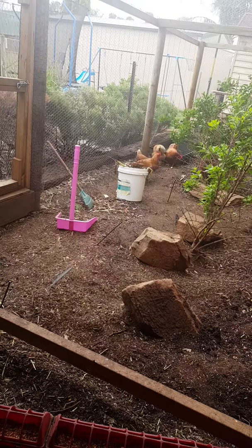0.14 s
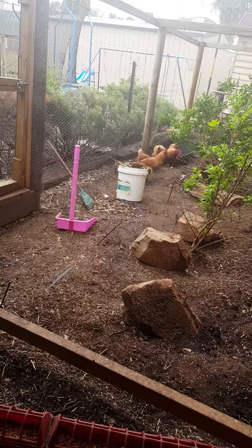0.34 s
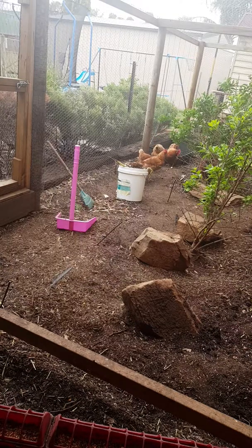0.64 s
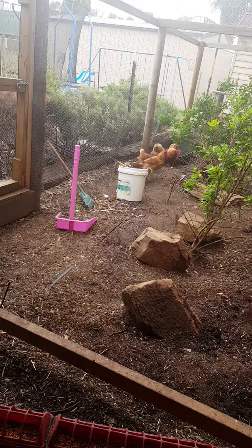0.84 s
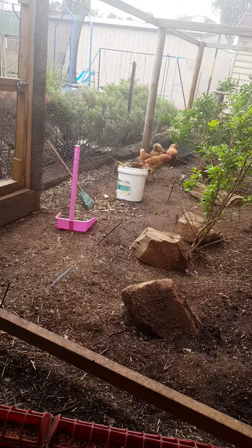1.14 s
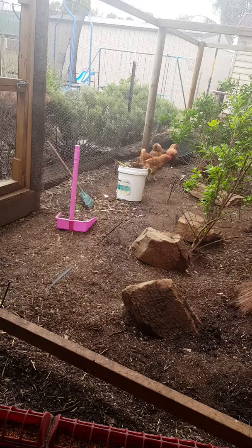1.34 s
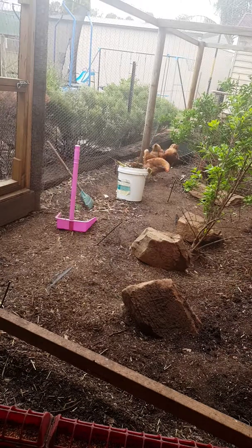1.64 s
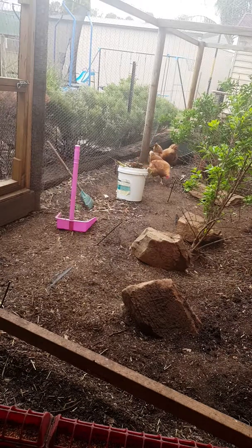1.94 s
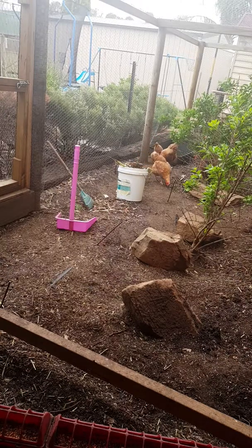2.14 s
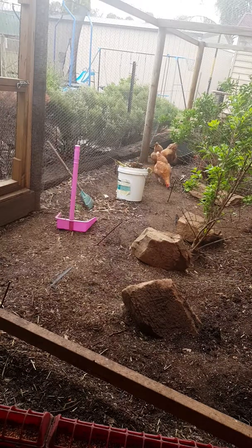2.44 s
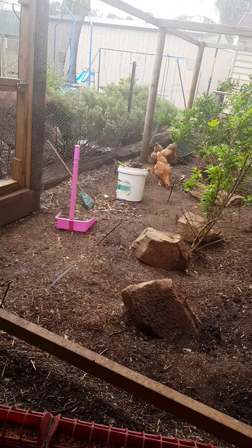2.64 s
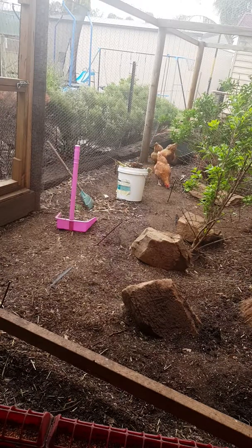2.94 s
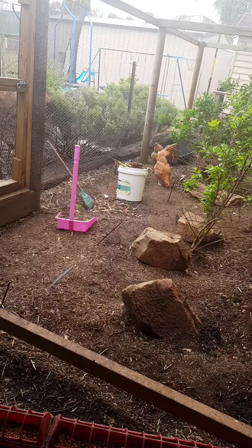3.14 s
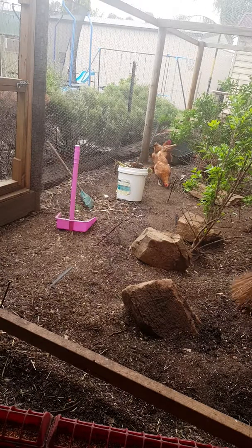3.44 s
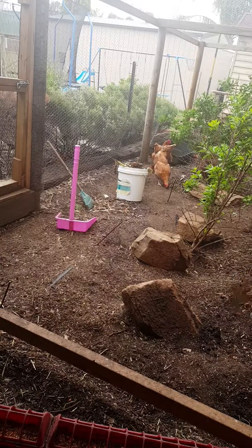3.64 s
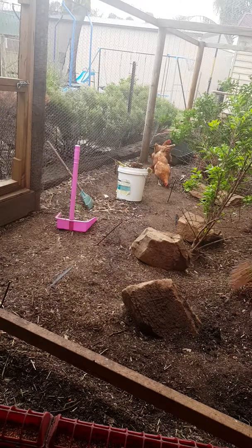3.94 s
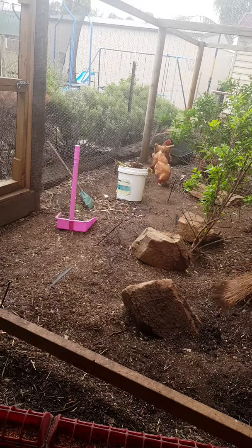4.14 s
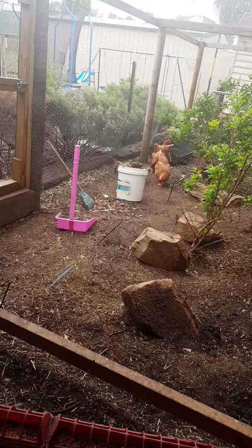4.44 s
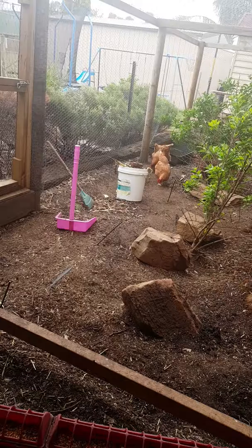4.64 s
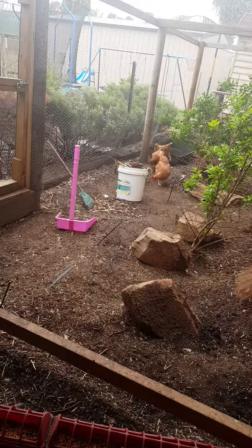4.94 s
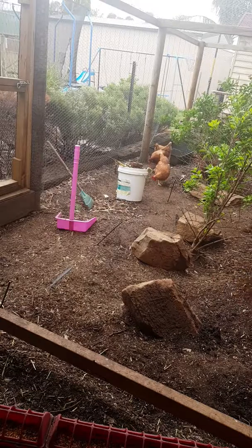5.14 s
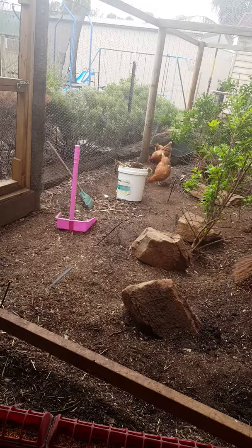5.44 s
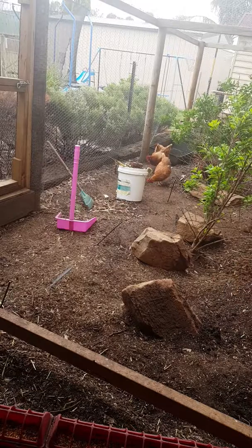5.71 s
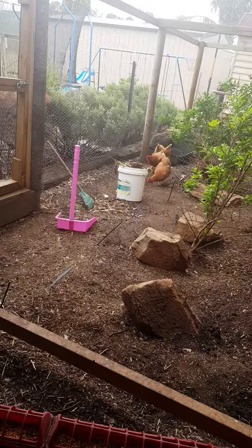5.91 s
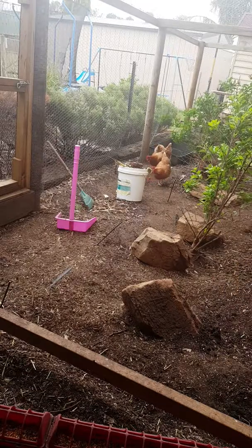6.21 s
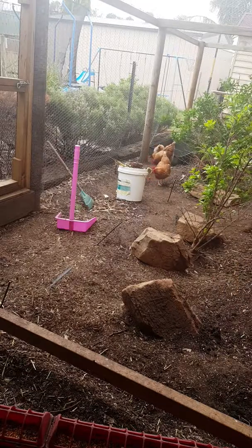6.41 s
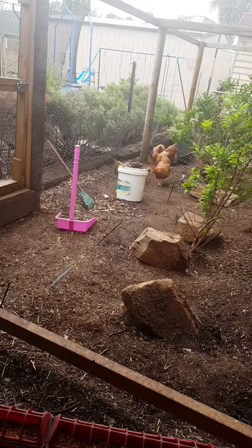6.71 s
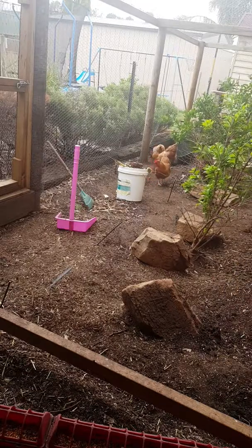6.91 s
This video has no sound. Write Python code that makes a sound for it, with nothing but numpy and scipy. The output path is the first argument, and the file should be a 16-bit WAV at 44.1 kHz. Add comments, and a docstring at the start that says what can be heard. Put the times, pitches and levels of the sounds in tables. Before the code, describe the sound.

Close, hissing broom scrapes over gritty soil, about two a second, while hard bangs echo further off above a low distant rumble.

```python
"""A distant rumble, the last settling dirt of a broom stroke and a soft footfall come first.
In a chicken run, close to the microphone, a straw broom sweeps dry dirt and mulch stroke after stroke:
shaped noise and tiny contacts scrape and hiss, caught straws snap, feet thud as short low cycles.
Three hard bangs and some weaker ones echo from further off as noise clusters with a hollow note.
Late on, a small far bird chirps once, a gliding tone blurred by echo."""
import sys
import numpy as np
from scipy import signal
from scipy.fft import rfft, irfft, next_fast_len
from scipy.io import wavfile
from scipy.ndimage import uniform_filter1d, map_coordinates

SR = 44100
rng = np.random.default_rng(int(sys.argv[2]) if len(sys.argv) > 2 else 0)


def wrap_up_sound(samples):
    """Save the sound to the file named by the first command line argument, as 16-bit audio."""
    columns = np.atleast_2d(samples).T
    # keep every value between -1 and 1, then stretch to whole-number steps
    tamed = np.clip(columns, -1, 1)
    steps = np.round(tamed * 32767).astype(np.int16)
    wavfile.write(sys.argv[1], SR, steps)


N = 311602  # length [samples]


def amp(db):
    """Decibels to gain."""
    return 10 ** (np.asarray(db) / 20)


def unit(x):
    """Scale to rms 1."""
    return x / np.sqrt(np.mean(x ** 2) + 1e-20)


def along(points, hz):
    """Read (frequency [Hz], value) points on a log-frequency axis."""
    f, v = np.transpose(points)
    return np.interp(np.log(hz + 1), np.log(f), v)


def wobble(rate, size=N):
    """A smooth random curve with rate knots a second."""
    knots = rng.standard_normal(int(size * rate / SR) + 4)
    return map_coordinates(knots, [np.arange(size) * rate / SR])


def filtered(x, response):
    """Multiply the spectrum of x by a response of frequency."""
    n = x.shape[-1]
    m = next_fast_len(n + 8192)  # padding keeps the end from wrapping onto the start
    return irfft(rfft(x, m) * response(np.fft.rfftfreq(m, 1 / SR)), m)[..., :n]


def coloured(x, spectrum):
    """Shape x with the given spectrum, at rms 1."""
    return unit(filtered(x, lambda hz: amp(along(spectrum, hz))))


def stereo_noise(alike, size):
    """White noise at two ports, as alike as given at each frequency, by mixing mid and side."""
    def mid_side(hz):
        turn = np.arccos(np.clip(along(alike, hz), -1, 1)) / 2
        return np.array([np.cos(turn), np.sin(turn)])

    mid, side = filtered(rng.standard_normal((2, size)), mid_side)
    return np.array([mid + side, mid - side])


def add(track, s, sound):
    """Mix a sound into the track at time s."""
    part = track[:, max(round(s * SR), 0):][:, :sound.shape[-1]]
    part += sound[..., :part.shape[1]]


# likeness of the background at the two ports: (frequency [Hz], likeness [0-1])
AMBIENT_ALIKE = [(60, 1), (180, 0.93), (350, 0.83), (700, 0.66), (1400, 0.02), (5000, 0)]
# spectra of the distant drone and the far traffic wash: (frequency [Hz], relative level [dB per Hz])
DRONE_SPECTRUM = [(20, -23), (40, -10), (60, -4.5), (76, 4), (100, -4), (150, -6.5), (250, -17.5),
                  (500, -42)]
WASH_SPECTRUM = [(60, -11), (200, -3.5), (320, -1.5), (500, -2), (800, 1), (1200, 0.5), (1800, -7.5),
                 (3000, -15.5), (7000, -16.5), (15000, -24.5)]
# level of the drone, before drone_db is added: (time [s], level [dB])
DRONE_LEVEL = [(0.0, -59), (1.93, -59.5), (3.4, -61.5), (3.85, -58), (6.92, -57), (7.06, -55.5)]
# level of the wash: (time [s], level [dB])
WASH_LEVEL = [(0, -54), (0.73, -52.5), (1.3, -54.5), (1.8, -52), (3.2, -51), (4.3, -51.5), (7.06, -52.5)]


def ambience(drone_db=4, patchy_db=1.85):
    """A distant low drone and the wash of far traffic, drifting slowly and unevenly from band to band."""
    def drift(curve):
        return amp(np.interp(np.arange(N) / SR, *np.transpose(curve)))

    drone = coloured(stereo_noise(AMBIENT_ALIKE, size=N), DRONE_SPECTRUM)
    z = signal.stft(stereo_noise(AMBIENT_ALIKE, size=N), nperseg=2048)[2]
    # random levels, smoothed over neighbouring bands and then over time
    patches = uniform_filter1d(rng.standard_normal(z.shape[1:]), size=3, axis=0)
    patches = uniform_filter1d(patches, size=8, axis=1)
    patchy = signal.istft(z * amp(patchy_db * unit(patches)), nperseg=2048)[1][:, :N]
    wash = coloured(patchy, WASH_SPECTRUM)
    return amp(drone_db) * drone * drift(DRONE_LEVEL) + wash * drift(WASH_LEVEL)


LAND_S, ARC = 0.045, 1.38  # time for all straws to land; roundness of the pressure arc (1 = straight slopes)
LIFT_DROP_DB, LIFT_S = 1.47, 0.03  # extra drop of the scrape as the broom lifts, and its time constant
TIPS_DB, FLICK_FADE_S = -0.33, 0.037  # hiss against scrape at touch-down; fade of the flick after the lift


def stroke(age, press_s, lift_s, db, swell_db, ease_db, flick_db, settle_db_per_s):
    """Gains of one stroke: land, press, ease off, lift, settle; hiss grows until the tips flick free."""
    before = np.clip(1 - age / press_s, 0, 1)
    after = np.clip((age - press_s) / max(lift_s - press_s, 1 / SR), 0, 1)
    lifted = np.maximum(age - lift_s, 0)
    pressure_db = db - swell_db * before ** ARC - ease_db * after ** ARC
    release_db = LIFT_DROP_DB * (1 - np.exp(-lifted / LIFT_S)) + settle_db_per_s * lifted
    scrape = np.minimum(age / LAND_S, 1) * amp(pressure_db - release_db)
    flick = np.minimum(age / lift_s, 1) * np.exp(-lifted / FLICK_FADE_S)
    return np.array([scrape, scrape * amp(TIPS_DB + flick_db * flick)])


DAB_RISE_S, DAB_FADE_S, DAB_TIPS_DB = 0.0056, 0.054, 1  # a dab's attack, its fade, its hiss against its scrape


def dab(age, db):
    """Scrape and hiss gains of a brief touch of the straws."""
    scrape = amp(db) * np.minimum(age / DAB_RISE_S, 1) * np.exp(-age / DAB_FADE_S)
    return np.array([scrape, scrape * amp(DAB_TIPS_DB)])


# broom strokes, close by; levels are before the trims in broom():
# (touch-down time [s], from touch-down to hardest press [s], from touch-down to lift [s],
#  level at hardest press [dB], swell up to it [dB], easing off to the lift [dB],
#  extra hiss as tips flick [dB], settling of dirt [dB per s])
STROKES = [(-0.401, 0.1, 0.22, -40, 5.0, 3.5, 4.0, 48.0), (0.061, 0.197, 0.32, -37, 15, 7.5, 3.5, 56.0),
           (0.742, 0.094, 0.31, -35.5, 3.5, 8, 6.0, 65), (1.278, 0.14, 0.33, -32.5, 12.5, 11, 11.5, 36),
           (1.836, 0.17, 0.27, -42, 4.5, 4.5, 2.5, 37), (2.326, 0.15, 0.18, -43.0, 10, 1.5, 3, 41),
           (2.932, 0.2, 0.309, -37.5, 2.5, 5, 9, 38), (3.467, 0.19, 0.32, -35.5, 12.5, 11.5, 8.5, 85.0),
           (4.043, 0.22, 0.3, -37.5, 4, 12, 9.5, 57), (4.521, 0.16, 0.24, -38.5, 6, 11, 5.5, 60),
           (4.959, 0.074, 0.3, -37.5, 5.5, 6.5, 7, 49), (5.479, 0.1, 0.3, -34.5, 9, 10, 7.5, 86),
           (6.082, 0.081, 0.22, -43.0, 8, 4, 4.5, 50), (6.651, 0.083, 0.22, -39.0, 7, 4.5, 2.5, 40)]
# light dabs of the broom between strokes, before the same trims: (time [s], level [dB])
DABS = [(1.206, -40), (2.224, -46.5), (4.768, -45.5), (4.888, -53), (5.333, -42), (6.04, -44.5),
        (6.577, -49.0), (6.64, -44.5)]


def stroke_gains():
    """Scrape and hiss gains of all the sweeping; overlapping strokes and dabs add in power."""
    power, age = np.zeros((2, N)), np.arange(SR) / SR
    for shape, rows in ((stroke, STROKES), (dab, DABS)):
        for s, *row in rows:
            heard = age[age >= -s]  # a stroke may begin before time 0
            add(power, s, shape(heard, *row) ** 2)
    return np.sqrt(power)


def grit(rate, spread_db, shared, smooth):
    """Tiny contacts of very unequal size on a bed of noise; some reach both ports alike."""
    size = amp(spread_db * np.minimum(rng.exponential(size=(3, N)), 4))
    happens = rng.random((3, N)) < rate / SR
    contacts = unit(happens * size * rng.choice([-1, 1], (3, N)))
    return unit(contacts[:2] + shared * contacts[2] + smooth * rng.standard_normal((2, N)))


def straw_rings(rate, centre_hz, spread_db, t60):
    """Single straws, each ringing briefly at its own pitch, with its own phase at each port."""
    chance = rng.random((int(rate * N / SR), 4))  # columns: when, pitch, size, phase
    t = np.arange(700) / SR
    hz = centre_hz * 2 ** (2 * chance[:, 1:2] - 1)  # within an octave either way
    rarity = -np.log(np.maximum(chance[:, 2:3], np.exp(-4)))
    size = amp(spread_db * rarity - 60 * t / t60)
    at = (chance[:, :1] * N).astype(int) + np.arange(len(t))
    ports = []
    for side in (-.5, .5):
        rings = size * np.sin(2 * np.pi * (hz * t + side * chance[:, 3:]))
        ports.append(np.bincount(at.ravel(), rings.ravel(), N)[:N])
    return unit(np.array(ports))


# spectra of straws scraping soil and of flicking tips: (frequency [Hz], relative level [dB per Hz])
SCRAPE_SPECTRUM = [(300, -36), (900, -15.5), (1500, -6), (2200, -3.5), (3000, -1.5), (4000, 0),
                   (5500, -0.5), (7500, -2), (10000, -4), (15500, -8.5)]
HISS_SPECTRUM = [(2000, -41), (5000, -9.5), (8000, -8.5), (10200, -5.5), (11500, 1), (12600, 2), (14000, 2),
                 (15500, 0.5)]


def broom(scrape_db=0.2, hiss_db=1.0, straw_db=-8, crumb_db=-52, crumb_follow=0.59):
    """Pressed straws scrape the soil while their tips flick grit; the bundle judders as it drags."""
    scrape_gain, hiss_gain = stroke_gains()
    judder_db = 0.85 * wobble(45) + 0.37 * wobble(220)
    scrape = coloured(grit(rate=6000, spread_db=2.5, shared=0.45, smooth=0.87), SCRAPE_SPECTRUM)
    hiss = coloured(grit(rate=4500, spread_db=2.0, shared=0.28, smooth=0.64), HISS_SPECTRUM)
    straws = straw_rings(rate=900, centre_hz=7010, spread_db=1.5, t60=0.023)
    # loose crumbs keep dropping as the stroke lets up, so they stand out in its tail
    crumbs = coloured(grit(rate=250, spread_db=2.0, shared=0.94, smooth=0), SCRAPE_SPECTRUM)
    crumbs = crumbs * (scrape_gain / scrape_gain.max()) ** crumb_follow
    pressed = scrape_gain * (amp(scrape_db) * scrape + amp(straw_db) * straws)
    flicked = hiss_gain * amp(hiss_db + 0.5 * wobble(90)) * hiss
    return (pressed + flicked) * amp(judder_db) + amp(crumb_db) * crumbs


# soft footfalls near the microphone: (time [s], level [dB], pitch [Hz], swell to the fullest push [s])
STEPS = [(.005, -46.5, 126.7, 0.022), (0.724, -40.5, 71, 0.0086), (0.774, -41, 86, 0.011),
         (1.621, -42, 66, 0.02), (4.488, -38.5, 83, 0.014), (4.539, -41, 110, 0.019),
         (5.409, -35, 72, 0.012), (5.455, -44.5, 91.6, 0.026), (6.279, -46.5, 71, 0.023),
         (6.785, -43.5, 83, 0.013), (6.832, -43, 75, .012)]


def steps(scuff_db=-12, knock_db=-10, knock_hz=215):
    """A foot pushes the soft ground: a few low cycles, the knock of the sole and a dull scuff."""
    out, t = np.zeros((2, N)), np.arange(SR // 4) / SR
    # (frequency [Hz], relative level [dB per Hz])
    scuff_spectrum = [(25, -25), (70, -4), (200, -4.0), (300, -18), (1500, -32), (5000, -58)]
    for s, db, hz, swell in STEPS:
        scuff = coloured(rng.standard_normal(len(t)), scuff_spectrum)
        push = t / swell * np.exp(1 - t / swell)
        knock = push ** 2 * np.sin(2 * np.pi * knock_hz * t)
        thud = push * np.sin(2 * np.pi * hz * t) + amp(knock_db) * knock
        add(out, s, amp(db) * (thud + amp(scuff_db) * np.sqrt(push) * scuff))
    return out


# resonances of the banged object: (frequency [Hz], width [Hz], height [dB])
BANG_MODES = [(400, 60, 2.5), (586, 79, 2), (850, 29, 7), (1115, 32, 1), (1320, 57, 4.5), (1970, 50, 6),
              (2260, 70, 7), (2550, 26, 7.5), (2810, 60, 3), (3270, 55, -2), (3770, 88, 6.5),
              (4750, 160, 7.5), (5760, 170, 9)]
# spectrum of the bangs before resonance and dulling: (frequency [Hz], relative level [dB per Hz])
BANG_SPECTRUM = [(100, -8), (280, -2.5), (700, -0.5), (1500, 1.5), (2500, 4.5), (5000, 4), (8000, 3),
                 (15000, 2)]
# decay of the bangs around the sheds: (frequency [Hz], time to fall 60 dB [s])
BANG_DECAY = [(300, 1), (1000, 0.44), (2500, 0.44), (6000, 0.26), (14000, 0.25)]
# likeness of the bangs at the two ports: (frequency [Hz], likeness [0-1])
BANG_ALIKE = [(300, 0.92), (800, 0.49), (2000, 0), (8000, 0.28)]
# echoing bangs, further off; burst and ring are trimmed again in bangs():
# (time [s], level [dB], dull above [Hz], rise [s], length of echo cluster [s], hollow ring [Hz], ring level [dB])
BANGS = [(0.472, -29.5, 5900, 0.0014, 0.032, 302, -12), (.648, -45.5, 7260, 0.0023, 0.022, 302, -33),
         (1.70, -45, 910, 0.0063, 0.027, 238, -14), (1.748, -34, 2120, 0.0063, 0.026, 238, -12),
         (1.83, -48.5, 790, 0.008, .025, 343, -4), (3.378, -29.5, 3300, 0.00069, 0.047, 353.6, -12)]


def body(f):
    """Resonant response of the banged object: a sum of peaks over a flat floor."""
    return 1 + sum((amp(g) - 1) / (1 + (2 * (f - c) / w) ** 2) for c, w, g in BANG_MODES)


def blow(f, dull_hz, focus=0.57, focus_db=3, focus_octaves=0.26):
    """Each blow dulls above its own given frequency, and drives the body hardest a little below it."""
    octaves_off = np.log2((f + 1) / (focus * dull_hz))
    return amp(focus_db * np.exp(-(octaves_off / focus_octaves) ** 2)) / np.sqrt(1 + (f / dull_hz) ** 4)


def bangs(crackle_db=0.0, ring_t60=0.72, ring_rise=0.024, ring_waver=0.46):
    """Each blow arrives as a dense cluster of wall echoes, and a hollow note rings on after it."""
    out = np.zeros((2, N))
    for s, db, dull_hz, rise, hold, ring_hz, ring_db in BANGS:
        hz, age, z = signal.stft(stereo_noise(BANG_ALIKE, size=SR), SR, nperseg=256)
        fade_db = -60 * np.maximum(age - hold, 0) / along(BANG_DECAY, hz)[:, None]
        tail = signal.istft(z * amp(fade_db), SR, nperseg=256)[1]
        t = np.arange(tail.shape[1]) / SR
        tail = tail * amp(crackle_db * wobble(444, size=len(t)))
        tail = filtered(tail, lambda f: amp(along(BANG_SPECTRUM, f)) * body(f) * blow(f, dull_hz))
        # level is set by the first 50 ms
        burst = (1 - np.exp(-t / rise)) * tail / np.std(tail[:, :SR // 20])
        note = np.sin(2 * np.pi * ring_hz * t + ring_waver * wobble(44, size=len(t)))
        ring = amp(ring_db - 60 * t / ring_t60) * (1 - np.exp(-t / ring_rise)) * note
        add(out, s, amp(db) * (amp(-3) * burst + amp(0.5) * ring))
    return out


# spectrum of a straw tip's crack: (frequency [Hz], relative level [dB per Hz])
SNAP_SPECTRUM = [(3000, -25), (9500, -17), (12500, 8), (15500, 3.5)]
# straws that catch and snap, close by; stalk_db is added to the knock:
# (time [s], starting level of the thin crack [dB], stalk's knock against it [dB])
SNAPS = [(1.2101, -50, -3), (1.5843, -22, -22), (2.296, -42, -7), (2.3648, -44, 8.5), (2.615, -40.5, 0),
         (3.2196, -23.5, -20), (3.343, -48, 8), (4.248, -28.5, -10), (4.488, -52, 10), (4.647, -32, -14),
         (4.7122, -29, -19), (4.7742, -44, 5), (5.3413, -35, -16), (5.642, -20, -23), (6.0447, -42, -11),
         (6.6473, -27, -17)]


def snaps(rustle_t60=.14, rustle_db=-14, stalk_db=-2):
    """A caught straw lets go with a crack and shakes its neighbours."""
    out, t = np.zeros((2, N)), np.arange(SR // 5) / SR
    for s, db, knock_db in SNAPS:
        crack = amp(-60 * t / .016)  # falls 60 dB in 16 ms
        rustle = amp(rustle_db - 60 * t / rustle_t60)
        tip = coloured(rng.standard_normal((2, len(t))), SNAP_SPECTRUM)
        stalk = coloured(rng.standard_normal((2, len(t))), SCRAPE_SPECTRUM)
        add(out, s, amp(db) * (crack + rustle) * (tip + amp(knock_db + stalk_db) * stalk))
    return out


def bird(start=5.898, length=0.055, low_hz=2720, high_hz=3190, db=-60.5, echo_t60=0.31, rasp=0.011):
    """One far, slightly raspy chirp that slides up and levels off, blurred by the yard."""
    out = np.zeros((2, N))
    u = np.arange(round(length * SR)) / (length * SR)  # progress through the chirp, 0 to 1
    glide = low_hz + (high_hz - low_hz) * np.sin(2 * u)
    pitch = glide * (1 + rasp * wobble(410, size=len(u)))
    note = np.sin(np.pi * u) * np.sin(2 * np.pi * np.cumsum(pitch) / SR)
    t = np.arange(SR // 4) / SR
    yard = rng.standard_normal((2, len(t))) * amp(-60 * t / echo_t60)  # decaying echoes
    add(out, start, amp(db) * unit(signal.fftconvolve(note[None], yard, axes=1)))
    return out


def scene():
    """The broom and feet close by, the rest of the yard behind them."""
    return ambience() + broom() + steps() + bangs() + snaps() + bird()


TOP_HZ = 15600  # band limit of the microphone
# balance of the microphone's two ports: (frequency [Hz], left minus right [dB])
BALANCE_DB = [(60, .2), (200, 1.5), (700, 0.4), (3000, 0.4), (6000, 0.5), (9000, 2.5), (13000, 1.1)]


def record(dry):
    """The left port is a little more sensitive; nothing is kept above the band limit."""
    def ports(hz):
        balance = amp(np.outer([.5, -.5], along(BALANCE_DB, hz)))  # half the difference each way
        return balance * (hz < TOP_HZ)

    return filtered(dry, ports)


dry = scene()
out = record(dry)
wrap_up_sound(out)
```